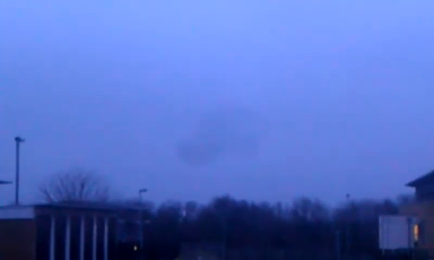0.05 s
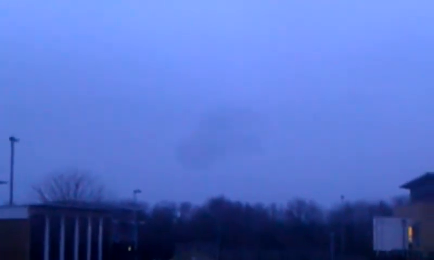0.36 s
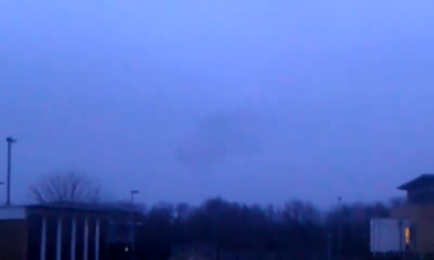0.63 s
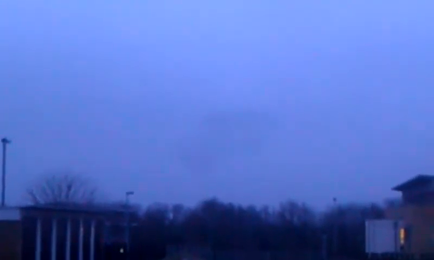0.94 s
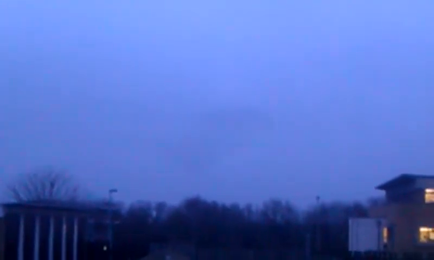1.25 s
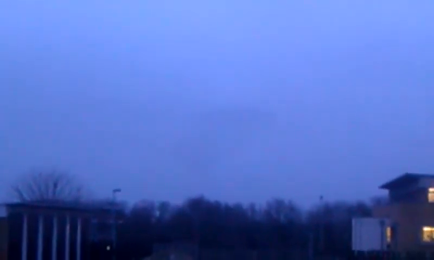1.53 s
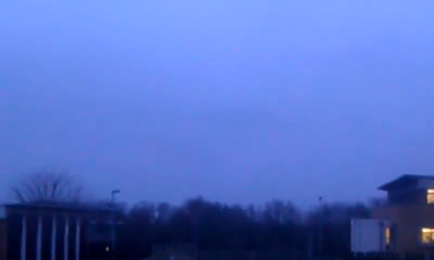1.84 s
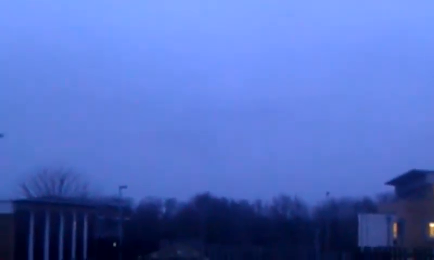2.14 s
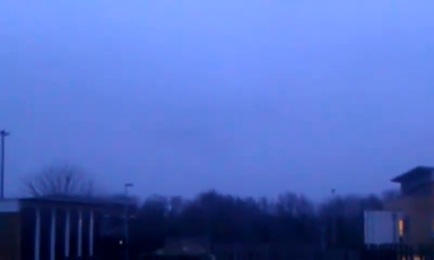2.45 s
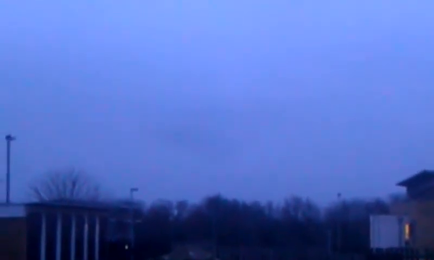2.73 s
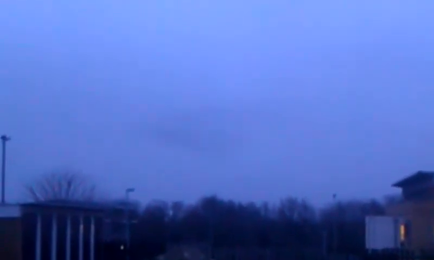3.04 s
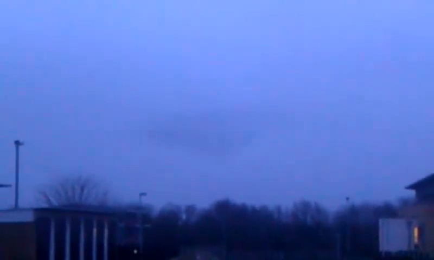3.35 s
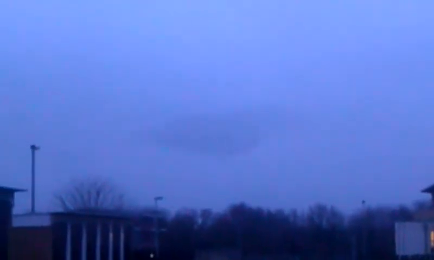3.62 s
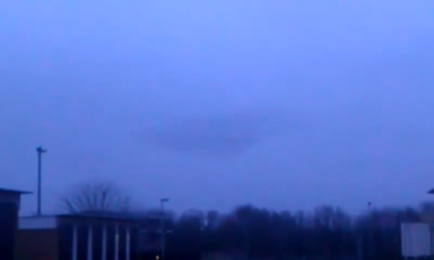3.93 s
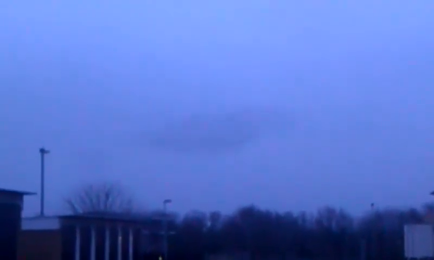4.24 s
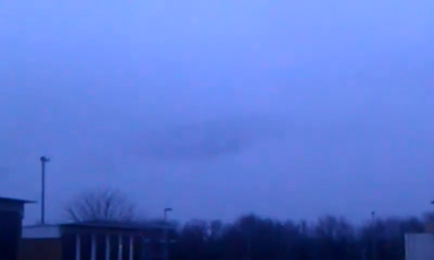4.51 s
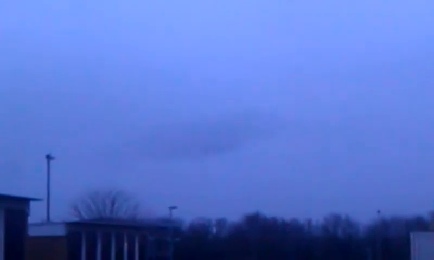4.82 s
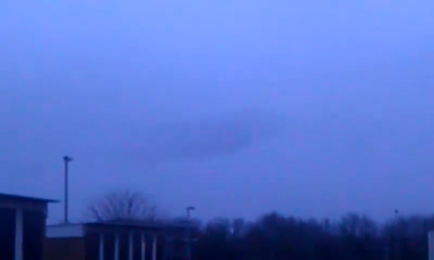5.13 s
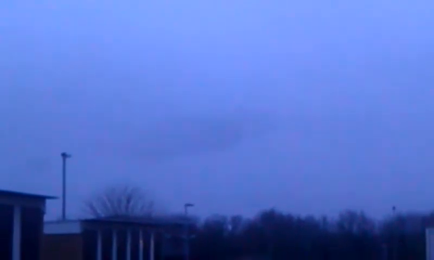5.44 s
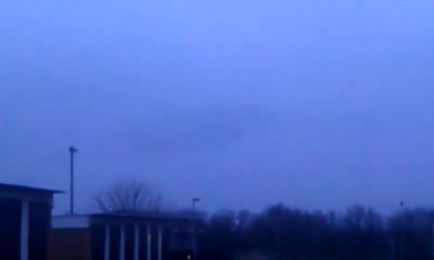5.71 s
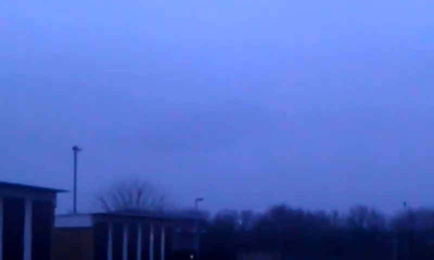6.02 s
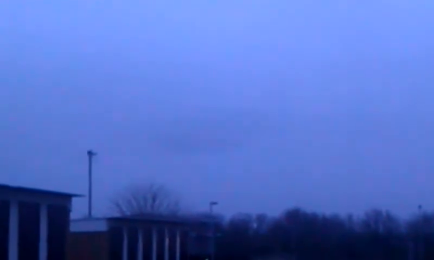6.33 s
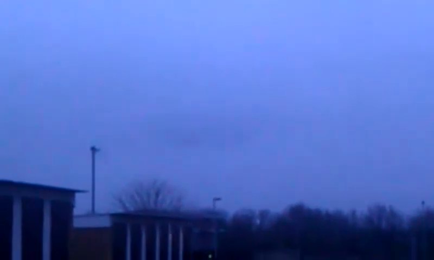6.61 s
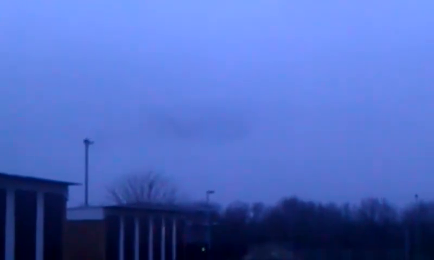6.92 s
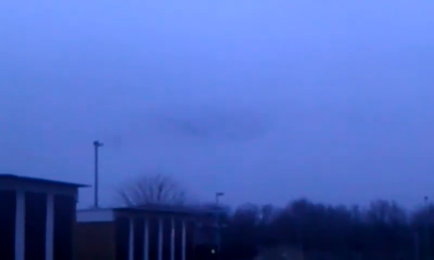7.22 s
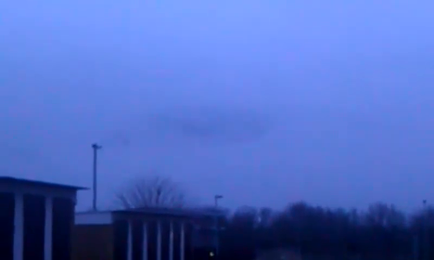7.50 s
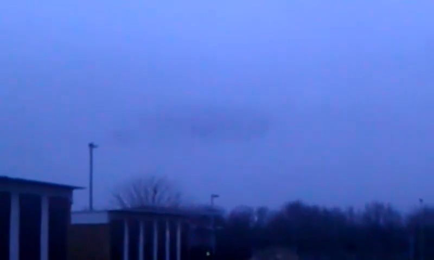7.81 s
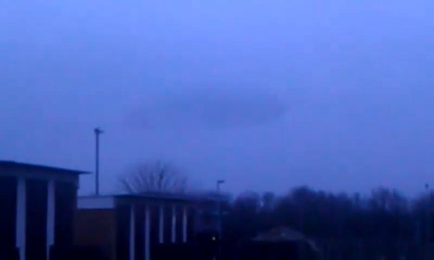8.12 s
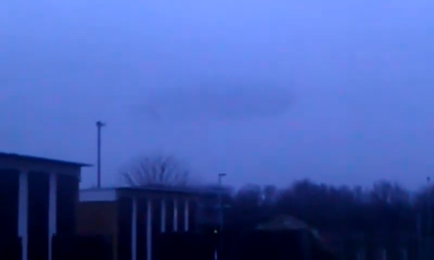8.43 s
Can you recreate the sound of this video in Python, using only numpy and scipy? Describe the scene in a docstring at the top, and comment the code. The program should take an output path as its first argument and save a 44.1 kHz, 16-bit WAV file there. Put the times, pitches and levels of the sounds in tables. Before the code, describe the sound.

Throughout, distant traffic makes a soft, steady roar across an open field, with light wind rumbling on the microphone and constant hiss. A far engine hums low, drifting in speed, under a very faint thin whine. From about 0.5 to 1.8 seconds a quiet horn-like drone swells and dies. A soft dry rustle gradually creeps in. Around 3 seconds come a small gust, a few light touches on the camera and a plastic tick. Near 5 seconds the whine steps slightly higher. From 5.6 seconds a hand regrips the camera: close, dull, boxy bumps with low rubbing and small plastic ticks. The loudest cluster lands at 6 seconds, another at about 6.7, thinning out by 7.3. A few faint, falling chirps sound far off between 7.1 and 7.8 seconds. A brief rustle and two soft bumps come just after 8 seconds.

```python
"""Dusk on an open field. From the start, distant tyres roar, light wind buffets the microphone, a far
engine changes speed and a thin whine sounds over preamplifier hiss. A brief drone swells and dies in
the first two seconds; a dry rustle creeps in, and near 5 s the whine steps up. From 5.6 s the hand-held
camera, touched lightly before, is gripped anew: dull bumps and a rumble of rubbing reach the microphone
through the case, and the plastic ticks. A few faint chirps follow after 7 s."""
import sys
import numpy as np
from scipy import signal
from scipy.fft import rfft, irfft, next_fast_len
from scipy.io import wavfile
from scipy.ndimage import map_coordinates

SR = 44100
rng = np.random.default_rng(int(sys.argv[2]) if len(sys.argv) > 2 else 0)


def to_wav(sig):
    """Store sig (one row per channel, or 1-D mono) as 16-bit WAV at the path in sys.argv[1].

    Samples outside -1..1 are clipped; the rate is SR.
    """
    pcm = np.clip(np.atleast_2d(sig), -1, 1) * 32767
    pcm = np.round(pcm).astype(np.int16)
    wavfile.write(sys.argv[1], SR, pcm.T)  # frames by channels


N = 373086
T = np.arange(N) / SR

# Pushes of the hand. Each row: time in seconds, force in dB, bandwidth in Hz, rubbing decay in seconds.
HAND_BUMPS = [(.560, -41.5, 130.3, .038), (2.769, -37, 190, 0.026), (2.787, -39, 288, 0.025),
              (2.908, -39, 149.4, .02), (3.008, -40, 140, 0.028), (3.205, -39, 59.7, .015),
              (5.608, -28.5, 130.5, 0.006), (5.7104, -24.5, 364, 0.002), (5.71, -25.5, 115, 0.0055),
              (5.752, -35, 151, 0.0074), (5.770, -25.5, 210, 0.013), (5.868, -32.5, 190, .02),
              (5.955, -32, 170, .012), (5.992, -10, 760, 0.0057), (5.9965, -3.5, 473, 0.0065),
              (6.0001, -6, 694, 0.0087), (6.007, -4, 500, 0.007), (6.012, -11, 680, .008),
              (6.0162, -16, 560, 0.0062), (6.0204, -15, 400, .008), (6.0256, -14, 400, 0.011),
              (6.0316, -10.5, 620, 0.013), (6.0431, -16.5, 398, 0.02), (6.0514, -19, 480, 0.0096),
              (6.0637, -15.5, 370, .004), (6.080, -36, 170, .006), (6.090, -18, 290, 0.006),
              (6.098, -20, 226, 0.011), (6.167, -32, 139, 0.023), (6.231, -33, 188, 0.033),
              (6.259, -39, 160, 0.03), (6.345, -20.5, 260, 0.0027), (6.370, -24.5, 173, 0.012),
              (6.392, -37, 190, 0.0084), (6.403, -30, 170, 0.012), (6.536, -39, 150, 0.011),
              (6.622, -36, 140, .01), (6.658, -31, 139, .012), (6.679, -21, 300, 0.008),
              (6.688, -23, 190, .006), (6.6938, -10, 418, 0.0058), (6.711, -12.5, 372, 0.0042),
              (6.719, -14.5, 220, 0.0091), (6.735, -17, 372, 0.015), (6.758, -21, 210, .015),
              (6.768, -26, 260, 0.014), (6.785, -17.5, 337, 0.0066), (6.807, -23.5, 210, 0.011),
              (6.835, -25, 220, 0.01), (6.861, -23, 220, 0.0062), (6.915, -30, 189, .006),
              (6.931, -26.5, 210, 0.014), (6.954, -22, 195, 0.016), (6.962, -30, 200, 0.0082),
              (6.981, -31, 200, 0.01), (7.163, -28, 159, 0.015), (7.172, -28, 250, 0.019),
              (7.183, -34, 180, .008), (7.190, -30.5, 230, 0.027), (7.276, -32, 160, .012),
              (7.323, -35, 150, .012), (8.345, -41, 160, 0.044), (8.428, -34.5, 170.7, .03)]
# Spectral peaks that give the bumps and rubbing their dull, boxy tone.
# Each row: frequency in Hz, width in Hz, gain in dB.
BUMP_COLOUR = [(69.5, 22.1, -4.5), (106.85, 96, -4.5), (232, 186, -7.5), (326, 127, -6.5), (442, 67, -10),
               (551, 60, -6), (637, 41, -5.5), (815, 57, -22), (850, 200, -9), (1400, 605, -17)]
# Snaps of the plastic. Each row: start in seconds, peak in dB, resonance in Hz, its width in Hz,
# decay of the grit in seconds.
PLASTIC_TICKS = [(1.846, -49, 3800, 2000, 0.007), (3.057, -40.5, 3800, 4200, 0.0006),
                 (5.269, -44, 4170, 1300, 0.005), (5.845, -41, 3300, 1400, 0.0035),
                 (5.9227, -31, 3350, 1090, 0.0005), (5.928, -41, 3870, 2200, 0.007),
                 (6.56, -44, 3600, 1550, 0.0028), (8.148, -50, 3560, 1550, 0.0014)]
# Course of the engine. Each row: time in seconds, crankshaft rate in Hz, level in dB,
# extra gain of the firing order in dB.
ENGINE_COURSE = [(0, 39.7, -57, 6.5), (.3, 39.34, -61, -1), (.58, 39.57, -62, 7.5), (.85, 36.4, -65, 0),
                 (1.1, 33.3, -62.5, -2), (1.5, 32.36, -56.5, -5), (1.85, 32.3, -65, 5),
                 (2.3, 32.94, -59.5, -0.5), (2.6, 33.6, -63, 5.5), (3.02, 34.5, -60, 1),
                 (3.13, 34.65, -63, 2), (3.36, 35.38, -61, 6.5), (3.75, 35.34, -60, 1),
                 (3.95, 35.25, -65, -1), (4.3, 35.1, -65, 0), (5.1, 37.23, -69, -2),
                 (7.5, 32.23, -68.5, -14), (8.46, 34.75, -56.5, -13)]
# Harmonics ahead of the exhaust. Each row: multiple of the crankshaft rate, relative level in dB.
CRANK_ORDERS = [(1, -17), (2, 0), (3, -3), (4, -16), (5, -16.5)]
# Partials of the drone. Each row: frequency in Hz, relative level in dB.
DRONE_PARTIALS = [(284.5, -4.5), (340.3, -1), (397.3, -4.5)]
# Course of the whine. Each row: time in seconds, pitch in Hz, level in dB.
WHINE_COURSE = [(0, 1574, -86), (.5, 1575, -76.5), (2.7, 1578, -70.5), (4.65, 1577, -74), (4.95, 1615, -80),
                (5.5, 1615, -82), (7.2, 1615, -69.5), (8.46, 1616, -73)]
# Far chirps. Each row: start in seconds, length in seconds, first and last pitch in Hz, level in dB.
CHIRP_NOTES = [(7.114, 0.06, 4120, 4080, -68), (7.535, 0.11, 3990, 3740, -71),
               (7.607, 0.19, 3720, 3660, -74), (7.745, 0.06, 2300, 1890, -64)]
# Swells of low rumble: light gusts near 0.5 and 2.85 s, a hand rubbing the camera around 6.5 s.
# Each row: time of the peak in seconds, width in seconds, level in dB.
RUMBLE_SWELLS = [(.5, 0.61, -65.5), (2.85, 0.16, -58), (6.5, 0.87, -53)]
# Swells of the rustle. Each row: time of the peak in seconds, width in seconds, level in dB.
RUSTLE_SWELLS = [(1.89, 0.14, -68), (2.8, 0.3, -68.5), (3.55, 0.23, -69), (5.3, 0.53, -72),
                 (6.85, 0.13, -66.5), (7.65, 0.17, -83), (7.98, 0.021, -69), (8.16, 0.037, -59.5),
                 (8.24, 0.033, -64), (8.38, 0.061, -69)]
# Spectra of the four noises. Each row: frequency in Hz, relative spectral density in dB.
RUMBLE_SPECTRUM = [(15, -15), (27, -6), (43, 1.5), (100, -3.5), (190, -3.5), (320, -11.5), (600, -28),
                   (1500, -66)]
RUSTLE_SPECTRUM = [(1200, -6), (2400, 0), (3200, -2), (3800, -1), (4400, -4), (5500, -18), (9000, -45)]
TYRE_SPECTRUM = [(25, -23), (45, -9.5), (100, 0), (220, -2.5), (420, -1.5), (620, -3), (800, 0.5),
                 (1050, 0.5), (1400, -6), (1850, -8.5), (2400, -15.5), (3600, -21.5), (5200, -38),
                 (9000, -62)]
HISS_SPECTRUM = [(100, 9), (4000, 2.5), (7000, 0.5), (12000, 0.5), (16000, -0.5)]


def handling(slips=64, slips_per_s=330, slip_db=-6, grip_s=0.00302, stick_s=0.0025, db_per_octave=26):
    """Stick-slip friction: small slips of the skin build up before each push and die away after it."""
    force = np.zeros(N)
    for s, db, bandwidth_hz, rub_s in HAND_BUMPS:
        add_push(force, s, undb(db), bandwidth_hz)
        lags = (np.arange(slips) + rng.random(slips)) / slips_per_s - 2 * grip_s
        fades_db = 20 * np.log10(np.e) * np.minimum(lags / grip_s, -lags / rub_s)
        sticking = np.exp(-(lags / stick_s) ** 2)  # the skin holds at the height of the push
        slides = rng.choice([-1, 1], slips) * (1 - sticking)
        for lag, fade_db, slide in zip(lags, fades_db, slides):
            slip_hz = bandwidth_hz * 2 ** (fade_db / db_per_octave)  # fading slips grow duller
            add_push(force, s + lag, slide * undb(db + fade_db + slip_db), slip_hz)
    return colour_bumps(force)


def add_push(force, s, strength, bandwidth_hz, reach=1024):
    """Soft contact: flesh spreads a push into a Gaussian pulse; the longer it is, the less treble."""
    near = slice(max(int(s * SR) - reach, 0), int(s * SR) + reach)
    force[near] += strength * np.exp(-(2 * np.pi * bandwidth_hz * (T[near] - s)) ** 2 / 2)


def colour_bumps(force, leak_hz=31.6):
    """Linear filtering: spectral peaks give a dull, boxy tone; the deepest bass leaks out of the case."""
    size = next_fast_len(N + SR, True)
    f = np.fft.rfftfreq(size, 1 / SR)
    peaks = sum(undb(db) * resonance(f, hz, width) for hz, width, db in BUMP_COLOUR)
    leak = (1j * f / (leak_hz + 1j * f)) ** 2
    dispersion = 1 - 2 * resonance(f, hz=318, width_hz=790)  # the lows arrive a little late
    return irfft(rfft(force, size) * peaks * leak * dispersion, size)[:N]


def ticks(top_hz=5200, grit_db=-22, shell_db=-17, size=4096):
    """Impulse response: a plastic seam lets go with a snap and some grit, and the shell rings briefly."""
    out = np.zeros(N + size)
    t, f = np.arange(size) / SR, np.fft.rfftfreq(size, 1 / SR)
    damping = signal.butter(N=8, Wn=top_hz, fs=SR, output="sos")
    shell = undb(shell_db) * resonance(f, hz=1800, width_hz=1300)
    for s, db, hz, width_hz, decay_s in PLASTIC_TICKS:
        snap = t == 0
        grit = undb(grit_db) * rng.standard_normal(size) * np.exp(-t / decay_s)
        ring = resonance(f, hz, width_hz) ** 2 - shell
        tick = signal.sosfilt(damping, irfft(rfft(snap + grit) * ring))
        start = int(s * SR)
        out[start:start + size] += undb(db) * tick / np.abs(tick).max()
    return out[:N]


def engine(muffler_hz=190, pipe_hz=178, pipe_width_hz=10, pipe_db=8, firing_order=2):
    """Source and filter: the muffler passes low orders; one sings out at the pipe's resonance."""
    crank_hz, level_db, boom_db = (curve(ENGINE_COURSE, column) for column in (1, 2, 3))
    out = 0
    for order, db in CRANK_ORDERS:
        hz = order * crank_hz
        pipe = np.abs(1 + undb(pipe_db) * resonance(hz, pipe_hz, pipe_width_hz))
        muffler = 1 / np.sqrt(1 + (hz / muffler_hz) ** 20)
        gain = undb(db + boom_db * (order == firing_order)) * pipe * muffler
        out += gain * far_tone(hz, fade_db=1.4, fade_rate=7, wander=0.0045)
    return out * undb(level_db)


def drone(start_s=0.44, attack_s=0.63, hold_s=0.21, release_s=0.48, level_db=-60.5):
    """Superposition: three partials swell and die away together as one far, horn-like sound."""
    partials = sum(undb(db) * far_tone(hz, fade_db=2.2, fade_rate=13.7, wander=0.0049)
                   for hz, db in DRONE_PARTIALS)
    corners_s = np.cumsum([start_s, attack_s, hold_s, release_s])
    return partials * undb(level_db) * np.interp(T, corners_s, [0, 1, 1, 0])


def whine():
    """A single sinusoid, heard thin and far, steps up in pitch once."""
    hz, level_db = curve(WHINE_COURSE, 1), curve(WHINE_COURSE, 2)
    return undb(level_db) * far_tone(hz, fade_db=1.0, fade_rate=9, wander=0.00094)


def chirps():
    """Frequency sweeps: short thin notes glide downward, blurred by the distance."""
    out = np.zeros(N)
    for s, length_s, start_hz, end_hz, db in CHIRP_NOTES:
        progress = np.clip((T - s) / length_s, 0, 1)
        hz = start_hz + (end_hz - start_hz) * progress
        note = far_tone(hz, fade_db=4.0, fade_rate=130, wander=0.01)
        out += undb(db) * np.sin(np.pi * progress) * note
    return out


def traffic(level_db=-54, rise_db=0.89, rise_span_s=(1.54, 1.63)):
    """Incoherent addition: many far tyres merge into one roar that the breeze stirs a little."""
    roar_db = level_db + np.interp(T, rise_span_s, [0, rise_db])
    return noise(TYRE_SPECTRUM) * undb(roar_db + 0.26 * walk(13.0))


def rumble(breeze_db=-66, flutter_db=3.2):
    """Turbulence and friction: the breeze's low rumble swells in two gusts, then as the hand rubs."""
    strength = np.sqrt(undb(breeze_db) ** 2 + swell_power(RUMBLE_SWELLS))
    return noise(RUMBLE_SPECTRUM) * strength * undb(flutter_db * walk(22))


def rustle(start_db=-76.5, end_db=-68, rise_s=5, flutter_db=2.25):
    """Amplitude-modulated noise: a dry rustle close by creeps in and stays, swelling now and then."""
    steady = undb(np.interp(T, [0, rise_s], [start_db, end_db]))
    strength = np.sqrt(steady ** 2 + swell_power(RUSTLE_SWELLS))
    return noise(RUSTLE_SPECTRUM) * strength * undb(flutter_db * walk(30))


def far_tone(hz, fade_db, fade_rate, wander):
    """Propagation through moving air: a sinusoid of rms near 1 wavers in level and pitch."""
    phase = 2 * np.pi * np.cumsum(hz * (1 + wander * walk(fade_rate))) / SR
    return np.sqrt(2) * np.sin(phase) * undb(fade_db * walk(fade_rate))


def resonance(f, hz, width_hz):
    """Second-order band-pass: one spectral peak, with gain 1 at its centre."""
    return 1j * f * width_hz / (hz ** 2 - f ** 2 + 1j * f * width_hz)


def noise(spectrum):
    """Spectral shaping: white noise is filtered to the given spectrum and scaled to rms 1."""
    size = next_fast_len(N, True)
    hz, db = np.transpose(spectrum)
    f = np.maximum(np.fft.rfftfreq(size, 1 / SR), 1)
    gain = undb(np.interp(np.log(f), np.log(hz), db))
    shaped = irfft(rfft(rng.standard_normal(size)) * gain, size)[:N]
    return shaped / np.sqrt(np.mean(shaped ** 2))


def swell_power(rows):
    """Incoherent addition: bell-shaped swells sum in power."""
    return sum(undb(db) ** 2 * np.exp(-((T - s) / width_s) ** 2) for s, width_s, db in rows)


def walk(rate):
    """Smooth random fluctuation that changes about rate times a second, with a spread near 1."""
    knots = rng.standard_normal(4096)
    return map_coordinates(knots, [T * rate], order=2, mode="wrap")


def curve(rows, column):
    """Linear interpolation of one column of a table over time."""
    rows = np.array(rows)
    return np.interp(T, rows[:, 0], rows[:, column])


def undb(db):
    """Amplitude ratio of a level in decibels."""
    return 10 ** (np.asarray(db) / 20)


def scene():
    """Superposition: the far sounds and the near ones add at one microphone."""
    far = traffic() + engine() + drone() + whine() + chirps()
    near = rumble() + rustle() + handling() + ticks()
    return (far + near)[None]


def record(dry, hiss_db=-63.5, top_hz=15700):
    """Noise floor and band limit: the preamplifier adds hiss, and a steep low-pass cuts the top."""
    hiss = undb(hiss_db) * noise(HISS_SPECTRUM)
    low_pass = signal.ellip(12, .1, 70, top_hz, fs=SR, output="sos")
    return signal.sosfilt(low_pass, dry + hiss)


dry = scene()
out = record(dry)
to_wav(out)
```